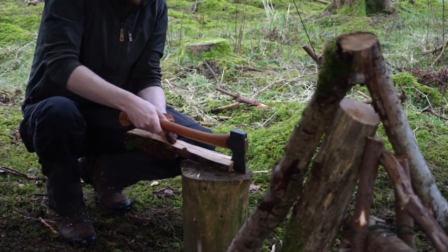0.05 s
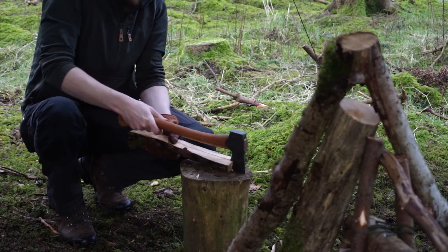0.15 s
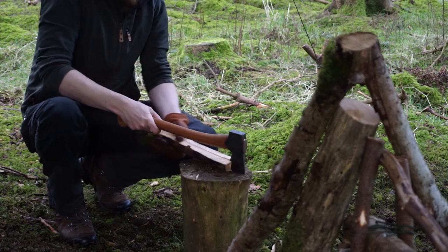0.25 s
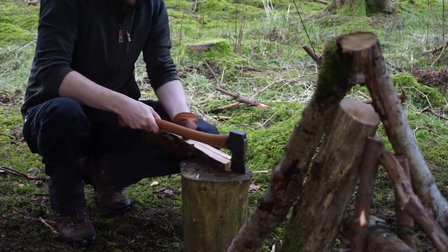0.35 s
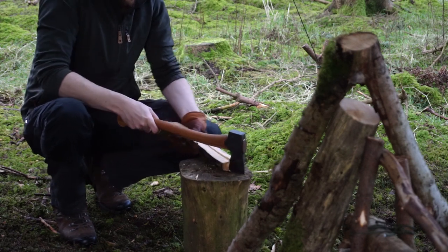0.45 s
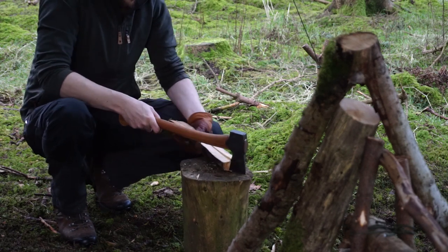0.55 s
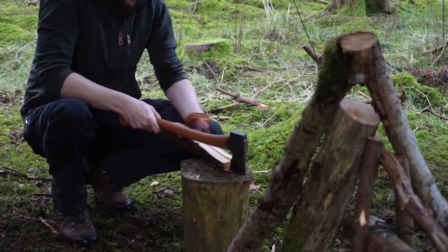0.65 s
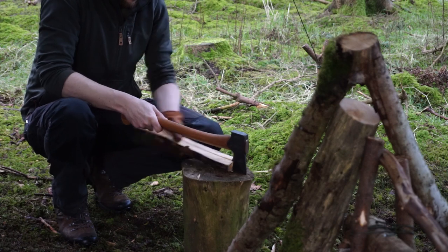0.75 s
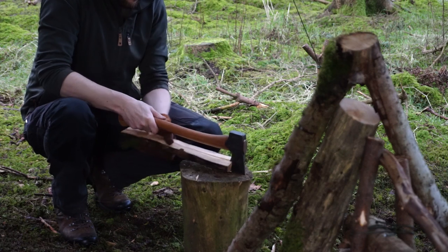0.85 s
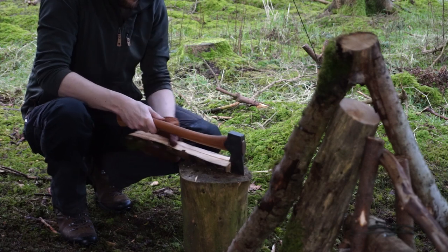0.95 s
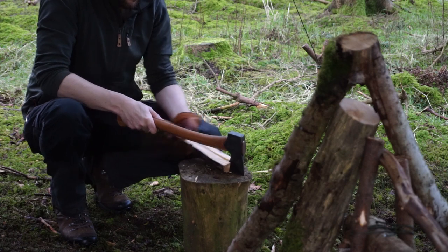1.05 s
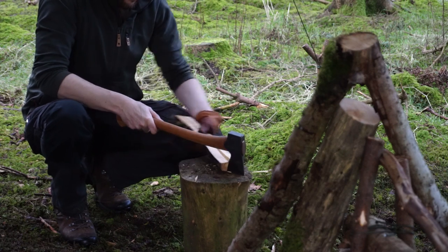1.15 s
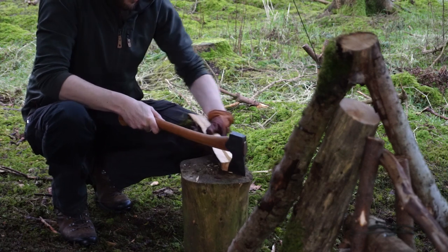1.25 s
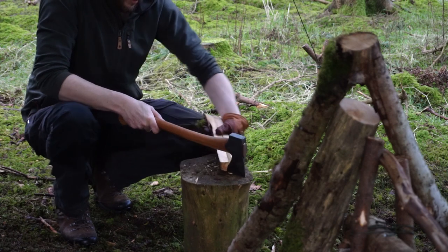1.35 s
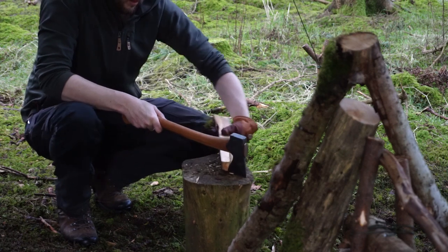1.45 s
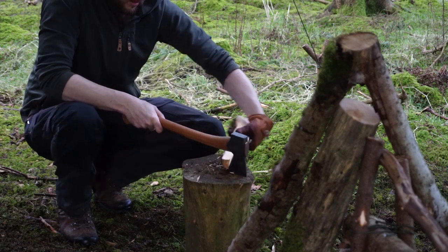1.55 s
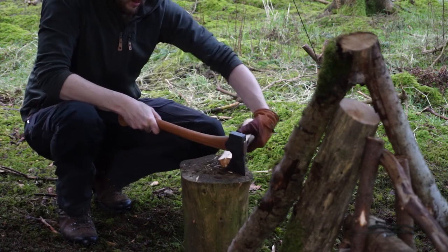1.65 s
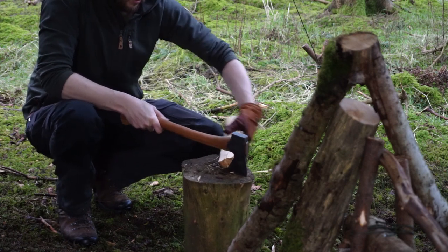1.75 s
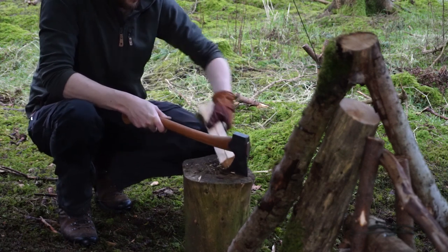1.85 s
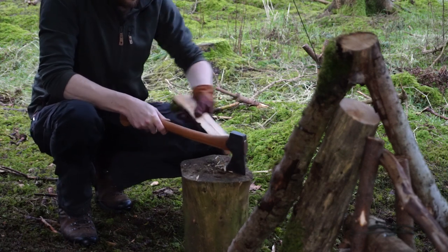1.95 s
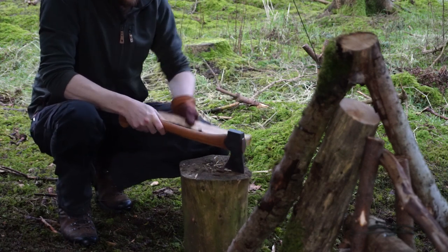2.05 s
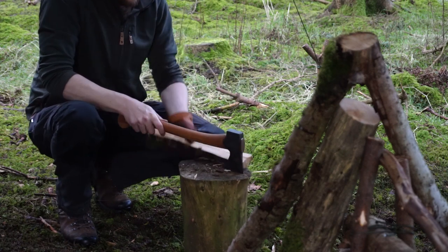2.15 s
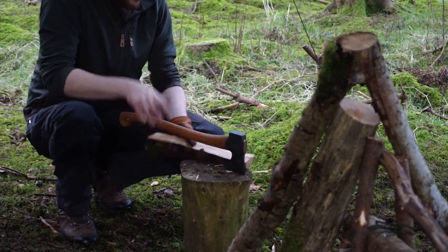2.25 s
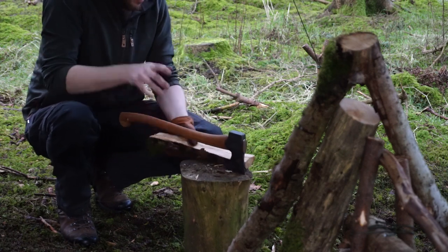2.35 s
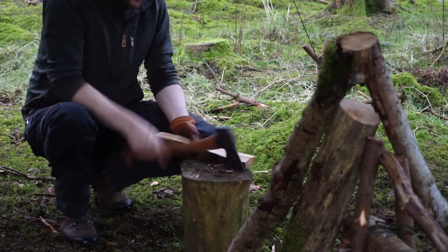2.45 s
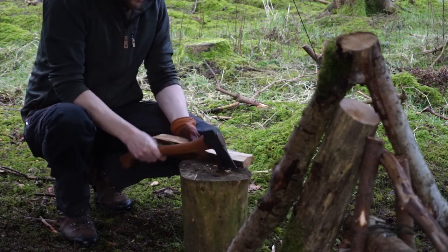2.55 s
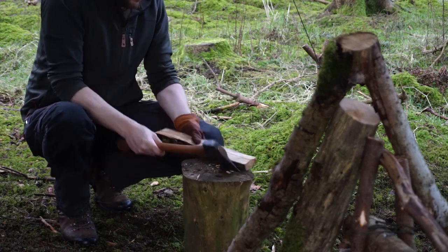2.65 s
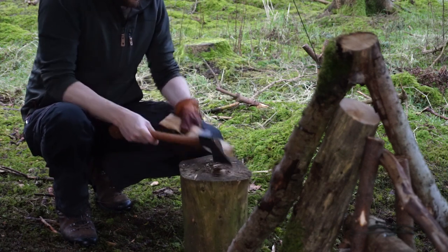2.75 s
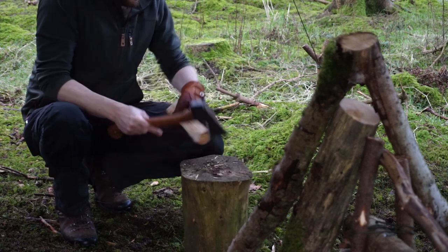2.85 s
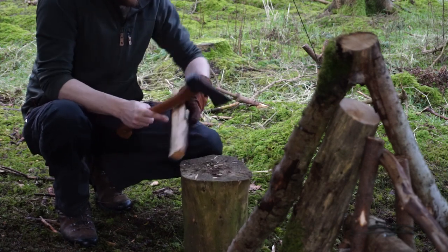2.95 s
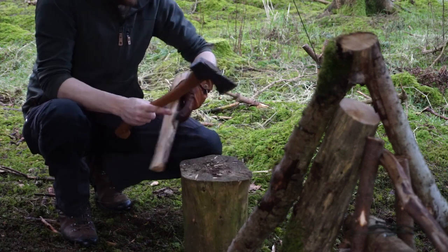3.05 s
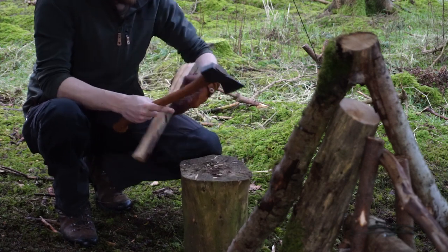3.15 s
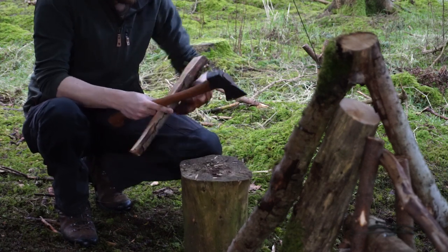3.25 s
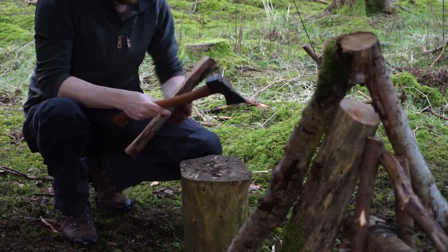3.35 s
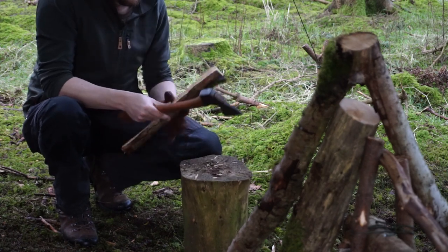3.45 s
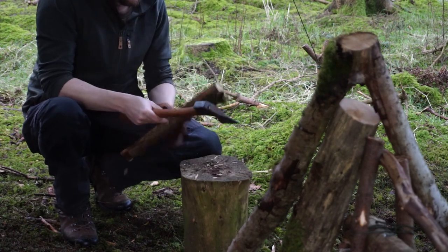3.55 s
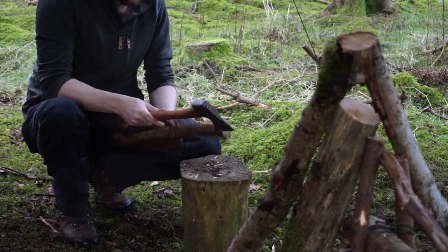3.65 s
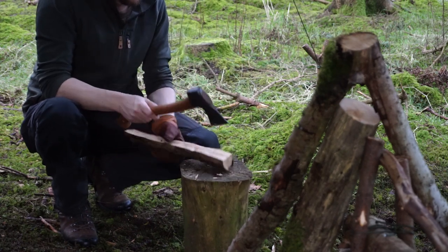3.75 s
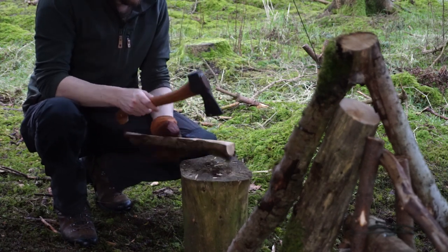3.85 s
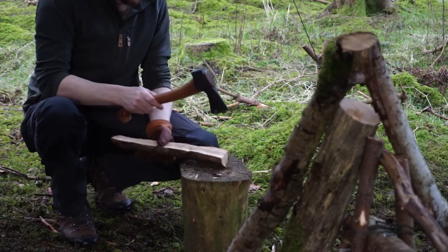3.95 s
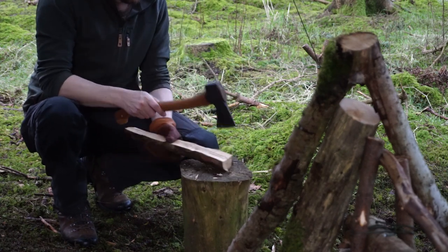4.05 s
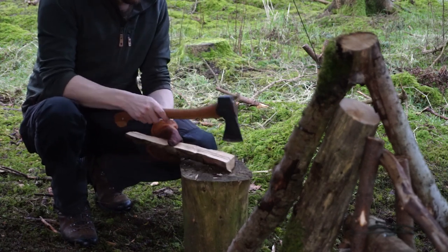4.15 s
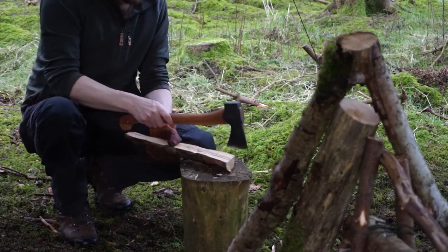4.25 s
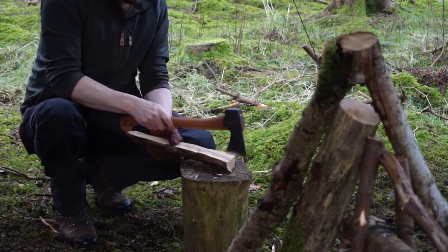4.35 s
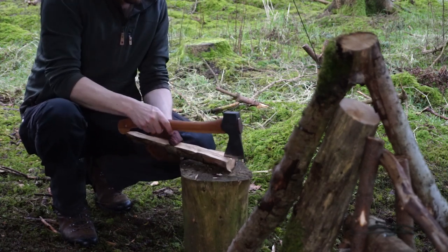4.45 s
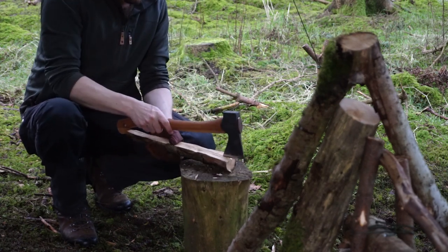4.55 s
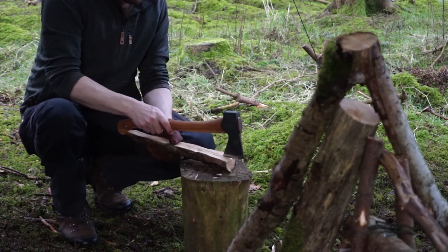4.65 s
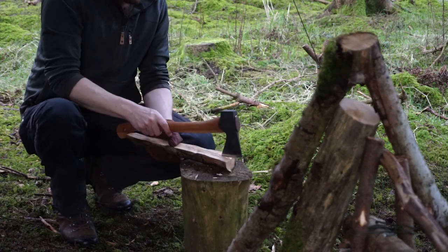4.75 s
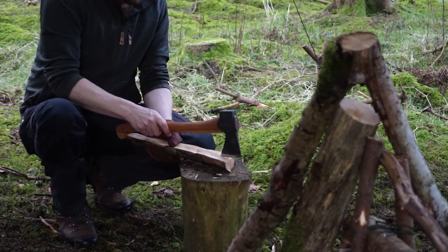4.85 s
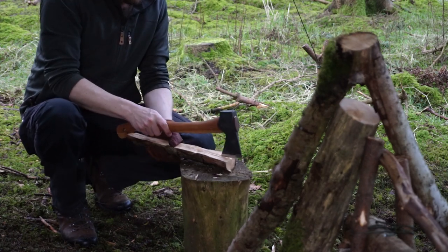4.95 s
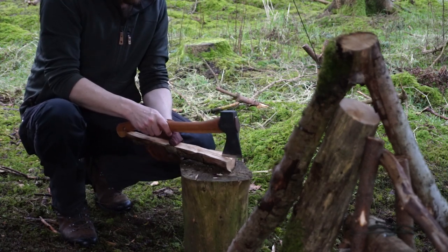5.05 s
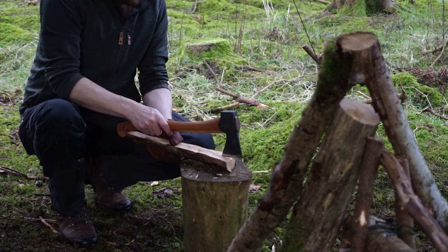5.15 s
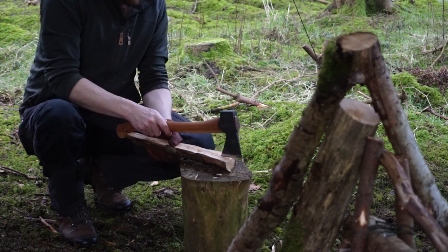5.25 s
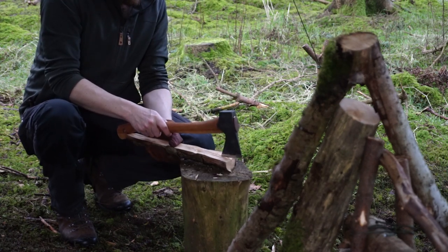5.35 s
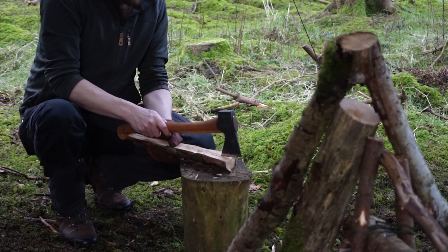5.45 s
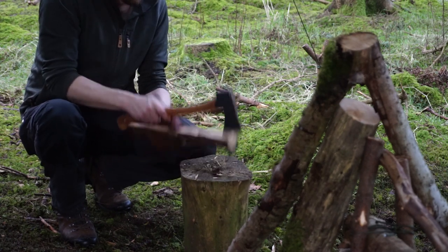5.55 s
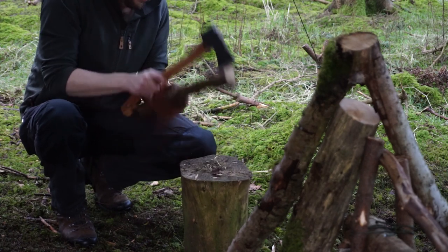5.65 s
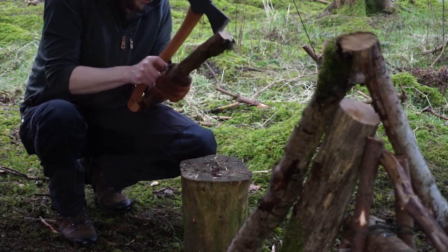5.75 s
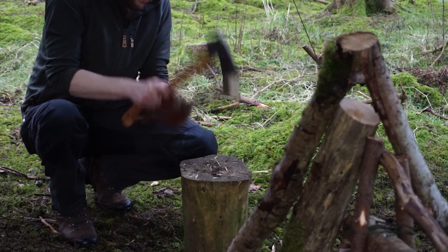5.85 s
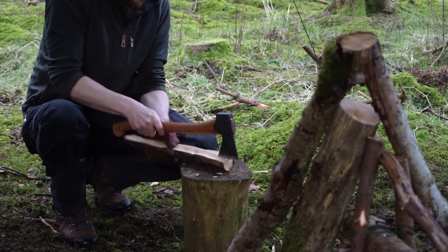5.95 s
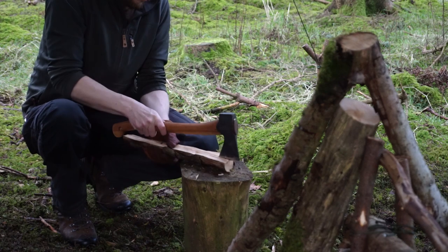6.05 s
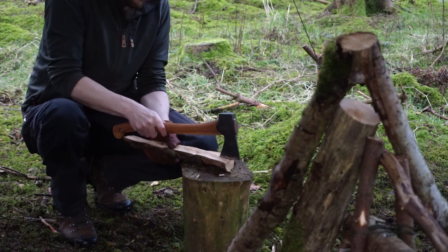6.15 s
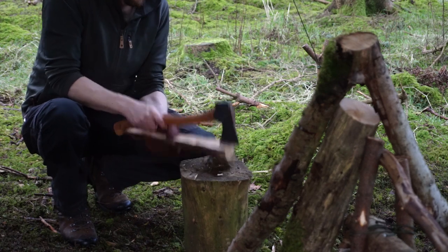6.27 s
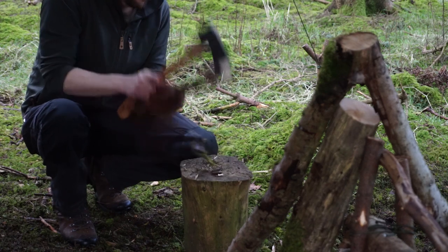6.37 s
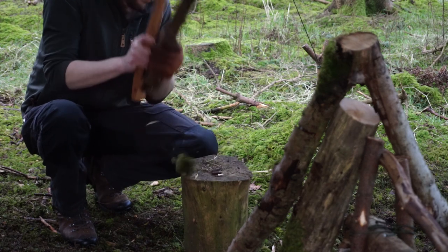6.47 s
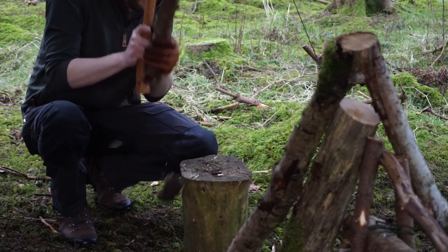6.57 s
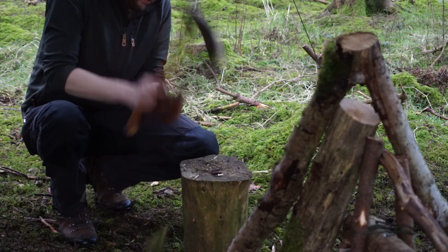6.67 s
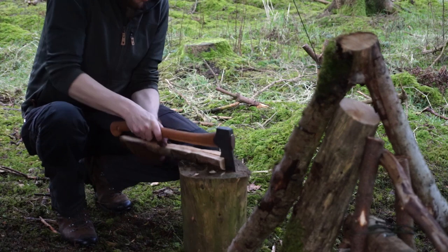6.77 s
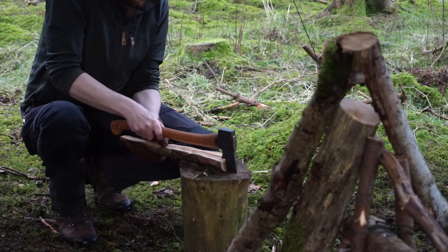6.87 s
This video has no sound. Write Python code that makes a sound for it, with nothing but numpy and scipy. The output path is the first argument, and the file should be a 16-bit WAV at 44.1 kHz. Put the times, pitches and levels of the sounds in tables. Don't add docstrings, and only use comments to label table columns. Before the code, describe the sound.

A quick, even bird trill opens the scene over still woodland air and a faint throbbing electronic hum. Fibres tick at 0.3 seconds, then a hatchet blow cracks at 0.36 and a harder one at 0.5, splintering and echoing briefly off trunks. A rattling bird call follows. A bright, hard knock lands at 1.3, with a weak splintery scrape near 1.65. Light knocks, snaps and cloth rustle come around 2.5 to 3.6, and a moderate woody tap at 3.8. From 3.9 to 4.7 birds whistle in swooping phrases over a low, soft coo, with small knocks between. Clear whistles and flicking chirps gather from 5.0 to 5.9. A full, resonant blow strikes at 6.0, a faint knock at 6.3, rustling at 6.5, and a heavy final split at 6.8 with crackle and rustle.

```python
import sys
import numpy as np
from scipy import signal
from scipy.io import wavfile
from scipy.ndimage import uniform_filter1d

SR = 44100
rng = np.random.default_rng(int(sys.argv[2]) if len(sys.argv) > 2 else 0)


def level_to_linear(level):
    exponent = np.asarray(level, float) / 20
    return 10 ** exponent


def wrap_up_sound(samples):
    columns = np.atleast_2d(samples).T
    tamed = np.clip(columns, -1, 1)
    steps = np.round(tamed * 32767).astype(np.int16)
    wavfile.write(sys.argv[1], SR, steps)


N = 304713

# frequency in Hz, level in dB.
CRACK_TONE = [(150, -44), (700, -1.5), (2300, -2.5), (3200, 6.5), (4100, -4), (8000, -10.5), (12000, -20),
              (16000, -35.5)]


def evened(x):
    return x / np.sqrt(np.mean(x ** 2) + 1e-20)


def read(points, hz):
    table_hz, value = np.transpose(points)
    return np.interp(np.log(hz + 1), np.log(table_hz + 1), value)


def add(mix, s, sound):
    part = mix[round(s * SR):][:len(sound)]
    part += sound[:len(part)]


def coloured(x, tone, tilt_db=0.):
    hz = abs(np.fft.fftfreq(2048, 1 / SR))
    gain_db = read(tone, hz) + tilt_db * np.log2(hz / 2000 + 0.019)
    log_gain = np.log(level_to_linear(gain_db))
    taps = np.fft.ifft(np.exp(np.conj(signal.hilbert(log_gain)))).real[:1024]
    return signal.oaconvolve(x, taps)[:len(x)]


def noise(tone, patchy_db):
    hz = np.fft.rfftfreq(1024, 1 / SR)
    a, b, patches = rng.standard_normal((N // 256 + 5, 513, 3)).T
    patches = uniform_filter1d(patches, size=12, axis=0)
    patches = evened(uniform_filter1d(patches, size=14, axis=1))
    z = (a + 1j * b) * level_to_linear(read(tone, hz)[:, None] + patchy_db * patches)
    return evened(signal.istft(z, nperseg=1024, noverlap=768)[1][:N])


def blow(s, row, modes, cycles):
    peak_db, contact_ms, crack_db, tilt_db, splinter_db = row
    splinter_t60 = 0.071
    t = np.arange(9000) / SR
    grit, split, chance = rng.standard_normal((3, len(t)))
    u = t * 1000 / contact_ms
    force = u * np.exp(1 - u)
    bursts = 1.36 + 2.4 * (chance > 1.9)
    splinters = level_to_linear(splinter_db - 60 * t / splinter_t60) * u.clip(0, 1) * bursts
    drive = force * (1 + 1.47 * grit) + 0.54 * splinters * grit

    ring = np.zeros(len(t))
    for hz, db in modes:
        cluster = np.sin(2 * np.pi * hz * t)
        cluster += 0.13 * sum(np.sin(2 * np.pi * hz * detune * t) for detune in (.93, 1.08))
        cluster *= level_to_linear(-60 * t * (hz * 1000) ** .5 / cycles)
        cluster *= np.minimum(t * hz, 1)
        struck = signal.fftconvolve(drive, cluster)[:len(t)]
        ring += level_to_linear(db) * struck / abs(struck).max()

    crack = coloured(split * (force + splinters), CRACK_TONE, tilt_db)
    sound = ring / abs(ring).max() + level_to_linear(crack_db) * crack / abs(crack).max()
    return s - .001, level_to_linear(peak_db) * sound / abs(sound).max()


def small_contact(s, peak_db, hz, t60, fizz_db):
    t = np.arange(3000) / SR
    shape = level_to_linear(peak_db - 60 * t / t60) * np.minimum(t / 0.00066, 1)
    ring = 0.55 * np.sin(2 * np.pi * hz * t) + 0.19 * np.sin(2 * np.pi * 1.17 * hz * t)
    fizz = evened(coloured(rng.standard_normal(len(t)), CRACK_TONE, 2.5))
    return s - .0005, shape * (ring + level_to_linear(fizz_db) * fizz)


def chopping():
    blow_starts = [.3642, .5011, 1.2751, 1.65, 2.4995, 2.5092, 3.7692, 5.9999, 6.3192, 6.7933, 6.8138]
    # peak in dB, contact in ms, crack against ring in dB,
    # crack tilt in dB per octave, splintering after it in dB.
    blow_rows = [(-7.5, 0.65, -1.5, 2.5, -17), (-1, 0.42, 5, -0.5, -14.5), (-1.5, 0.74, -7.5, 1.5, -17.5),
                 (-21.5, 0.62, 3, 0, 25), (-24, 2.3, -18, 6, -7), (-18.5, 1.06, -4.5, -2.5, -3),
                 (-14.5, 0.39, -0.5, -8, -8.5), (-3.5, 0.89, -4.5, 3, -10.5), (-22, 1.03, -2.5, -11.5, -8),
                 (-24, 1.7, -2, 4.5, 3), (-2, 1.4, 5, 0.5, -1)]
    # mode in Hz, level in dB.
    blow_modes = [
        [(1150, -3.5), (2130, -2), (3000, 0), (4700, 10)],
        [(340, -17), (580, -4), (760, 8), (1130, 3), (1620, 0), (2280, 3), (2500, 10.5), (3200, -6), (4950, -5)],
        [(600, -28), (1130, -9), (1550, -15.5), (3140, 7), (3750, -29), (4950, -8), (6500, -8), (8300, -8)],
        [(330, -7.5), (1000, -3), (2500, 4), (3400, 5.5)],
        [(700, -4), (980, -4)],
        [(235, -0.5), (700, -10), (980, -4), (3250, -11)],
        [(290, -4.5), (670, -4), (925, -10), (1300, 11.5), (1570, 8), (3050, -17)],
        [(200, -14), (285, 10), (620, 15), (945, 16), (1150, 11), (1400, 10), (1600, 7), (1870, 8), (2450, 3),
         (2870, 1), (3430, 5), (7450, 5.5)],
        [(206, 5.5), (490, 8), (620, 7.5), (800, 13), (1190, -1), (1410, 0.5), (1650, -3), (2860, -7)],
        [(510, -7.5), (1380, -1), (2580, -7), (3500, -4)],
        [(215, -4.5), (620, 3), (930, -6), (1140, 8), (1690, 7.5), (2300, 6), (2700, 6), (3050, 8), (3410, 8),
         (4600, -28)],
    ]
    grip_cycles = [25., 32, 29, 27, 28, 25., 23, 20, 17, 30, 26]
    # start in seconds, peak in dB, pitch in Hz, fizz against the pitch in dB.
    fibre_snaps = [(0.301, -28.5, 3360, -5), (0.3167, -26.5, 3230, -17), (0.342, -23.5, 3370, -6.5),
                   (0.349, -14.5, 3450, -19), (0.3685, -21, 4180, -9), (0.3956, -15.5, 3200, -9.5),
                   (0.4026, -23, 3450, -14), (0.419, -27, 2590, -8.5), (0.533, -22, 3060, -12),
                   (0.543, -29, 2720, -7), (1.0492, -44, 3640, -3), (1.1147, -41, 3000, -5),
                   (1.2316, -34, 1570, -12), (1.317, -22, 3230, -20), (1.597, -39, 3170, -7),
                   (1.63, -36.5, 2940, -3), (1.6422, -27.5, 3580, -6), (2.2412, -39, 2520, -11),
                   (2.269, -37.5, 2840, -8.5), (2.834, -32, 2500, -12), (3.1966, -40, 2490, -7),
                   (3.2864, -33, 2630, -9), (3.5185, -35, 6100, -12), (3.5208, -30.5, 3140, -8.5),
                   (3.6064, -30.5, 4580, -12.5), (3.625, -32.5, 6870, -7), (3.68, -41, 2280, -3),
                   (4.503, -30.5, 1720, -10.5), (4.5035, -42, 6300, -15), (5.7537, -36, 2780, -26),
                   (6.4537, -38, 2230, -17), (6.856, -21.5, 2720, -12)]
    # start in seconds, peak in dB, pitch in Hz, t60 in seconds, fizz in dB.
    small_knocks = [(1.233, -40, 762, 0.083, -14), (1.678, -27, 362, 0.015, -28),
                    (2.539, -36.5, 616, 0.051, -13), (2.8342, -25, 560, 0.02, -14),
                    (3.319, -37.5, 890, 0.065, -20), (3.806, -27.5, 646, 0.053, -16.5),
                    (3.825, -27, 667, 0.041, -21), (4.37, -28.5, 610, 0.025, -19),
                    (6.0012, -14, 620, 0.021, -8), (6.0095, -11, 480, 0.016, -34.5),
                    (6.8172, -12, 610, 0.035, -31), (6.8141, -5, 3300, 0.014, -14),
                    (2.844, -38, 480, .05, -25)]
    snap_t60, mic_cut_hz = 0.018, 226

    out = np.zeros(N)
    for hit in zip(blow_starts, blow_rows, blow_modes, grip_cycles):
        add(out, *blow(*hit))
    for s, peak_db, hz, fizz_db in fibre_snaps:
        add(out, *small_contact(s, peak_db, hz, snap_t60, fizz_db))
    for row in small_knocks:
        add(out, *small_contact(*row))
    return signal.sosfilt(signal.butter(4, mic_cut_hz, "high", fs=SR, output="sos"), out)


def thuds():
    # start in seconds, level in dB.
    ground_thuds = [
        (6.06, -64),
        (6.8, -65),
    ]
    thud_hz, thud_s = 74, .09
    t, out = np.arange(0, thud_s, 1 / SR), np.zeros(N)
    swell = np.sin(np.pi * t / thud_s) ** 2 * np.sin(2 * np.pi * thud_hz * t)
    for s, db in ground_thuds:
        add(out, s, level_to_linear(db) * swell)
    return out


def rustle():
    # start in seconds, end in seconds, rms level in dB.
    movements = [(0.277, 0.499, -54), (0.67, 0.828, -59), (1.035, 1.105, -54.5), (1.228, 1.273, -51),
                 (1.305, 1.463, -55), (1.563, 1.713, -55), (2.223, 2.287, -63), (2.55, 2.649, -57),
                 (2.777, 2.907, -58), (3.04, 3.307, -61.5), (3.26, 3.38, -52), (3.314, 3.804, -56.5),
                 (4.09, 4.125, -59), (4.597, 4.797, -75), (5.717, 5.79, -59), (6.03, 6.152, -67),
                 (6.426, 6.495, -57), (6.53, 6.679, -53.5), (6.82, 7.0, -44)]
    # frequency in Hz, level in dB.
    cloth_tone = [(100, -63), (400, -3), (1200, 5), (3000, 4.5), (6000, 2), (10000, -9), (15000, -31.5)]
    size = level_to_linear(2.3 * np.minimum(rng.exponential(1, N), 3.6))
    happens = rng.random(N) < 900 / SR
    slips = size * happens * rng.standard_normal(N)
    movement = np.zeros(N)
    for start, end, db in movements:
        add(movement, start, level_to_linear(db) * signal.windows.tukey(round((end - start) * SR), .7))
    return movement * evened(evened(coloured(slips, cloth_tone)) + 1.8 * noise(cloth_tone, 2.2))


def echoes(x):
    # delay in seconds, level in dB.
    returns = [
        (.0065, -5.5),
        (0.017, -13.5),
        (0.033, -42.5),
        (.043, -23),
    ]
    out = np.zeros(N)
    for delay, db in returns:
        add(out, delay, level_to_linear(db) * x)
    return coloured(out, [(300, -26.0), (1500, -5.0), (3200, -7.5), (6000, -10.0), (12000, -6.0)])


def tail(x, stretch):
    # frequency in Hz, t60 in seconds.
    wood_t60 = [(200, 0.96), (800, 0.33), (3000, 0.75), (6000, 0.53), (12000, 0.33)]
    taps = np.zeros(SR)
    at = np.arange(300, SR - 20, 20) + rng.integers(0, 20, (SR - 301) // 20)
    taps[at] = rng.choice([-1., 1.], len(at))
    hz, t, z = signal.stft(taps, SR, nperseg=256)
    decay = level_to_linear(-60 * t / (stretch * read(wood_t60, hz)[:, None]))
    taps = signal.istft(z * decay, SR, nperseg=256)[1]
    return signal.oaconvolve(x, taps / np.linalg.norm(taps))[:N]


def slur(start, length, from_hz, to_hz, db):
    u = np.linspace(0, 1, num=16)
    hz = from_hz + (to_hz - from_hz) * np.sin(u * np.pi / 2) ** 2
    return np.c_[start + u * length, hz, db - 2.5 * (2 * u - 1) ** 2]


def held(start, length, from_hz, to_hz, db):
    u = np.linspace(0, 1, num=16)
    hz = to_hz + (from_hz - to_hz) * np.exp(-u / 0.299)
    return np.c_[start + u * length, hz, db - 6.5 * u]


def whistle(rows, waver, size=300):
    s, hz, db = np.transpose(rows)
    t = np.arange(s[0], s[-1], 1 / SR)
    drift = uniform_filter1d(rng.standard_normal(len(t)), size=size)
    flutter = 1 + waver * evened(uniform_filter1d(drift, size=size))
    edge = np.minimum(np.minimum(t - s[0], s[-1] - t) / 0.0052, 1)
    tone = np.sin(2 * np.pi * np.cumsum(np.interp(t, s, hz)) / SR)
    return s[0], np.sqrt(2) * level_to_linear(np.interp(t, s, db)) * edge * flutter * tone


def songs():
    # start in seconds, length in seconds, from Hz, to Hz, level in dB.
    thrush = [(1.7, 0.15, 2246, 2404, -66), (2.35, .15, 2324, 2220, -72), (2.745, 0.07, 2920, 3700, -62),
              (3.4, .32, 1514, 1640, -66.5), (4.66, 0.2, 2344, 2258, -67), (4.95, 0.052, 3350, 3730, -67),
              (4.95, 0.13, 2110, 1900, -68.5), (5.11, 0.046, 3220, 3980, -60.5),
              (5.385, 0.066, 2920, 3020, -63), (5.455, 0.052, 2745, 2340, -58.5),
              (5.62, 0.059, 2540, 2060, -61.5), (5.865, .055, 1900, 2700, -65),
              (6.1, .045, 1926, 2450, -64), (6.335, 0.043, 2200, 2460, -65)]
    finch = [(3.55, 0.19, 2400, 2310, -68), (4.25, .052, 4870, 5670, -63), (4.97, .06, 7200, 7400, -69),
             (4.99, 0.047, 4690, 4370, -69), (5.385, 0.051, 1790, 1990, -71),
             (5.415, .035, 4000, 3150, -63), (5.6, 0.05, 4300, 3100, -64), (5.5, .02, 2000, 2500, -64),
             (6.19, 0.019, 3370, 3580, -63), (6.24, 0.046, 2880, 3660, -62.5), (6.35, .07, 4220, 4230, -74),
             (6.4, .03, 2450, 2250, -69)]
    robin = [(3.09, 0.098, 4070, 4380, -62), (3.88, .03, 5110, 5000, -60), (4.35, 0.14, 4020, 4000, -64),
             (5.085, 0.011, 7060, 5800, -59), (5.28, 0.093, 3084, 2906, -45),
             (5.37, 0.066, 6000, 4900, -65), (5.45, 0.057, 2890, 2810, -44.5),
             (5.515, 0.44, 2920, 2852, -64), (5.81, 0.043, 2410, 2280, -60)]
    wren = [(5.262, .028, 3500, 4000, -65), (5.458, .026, 3150, 4000, -56.5), (5.552, .05, 3950, 4450, -62),
            (5.657, 0.033, 3100, 4200, -59), (5.73, .035, 3250, 4150, -65), (5.785, .04, 2850, 3670, -57),
            (5.83, 0.038, 3400, 3310, -62), (5.955, .025, 3100, 3500, -64)]
    dove = [
        (0.0, 0.64, 373.3, 382.8, -60.5),
        (3.95, 1.05, 415.8, 418.6, -66),
    ]
    # time in seconds, pitch in Hz, level in dB.
    phrases = [
        [(3.872, 3600, -66), (3.892, 3830, -62), (3.905, 3720, -57), (3.925, 3330, -55), (3.945, 3150, -58),
         (3.965, 3000, -60), (3.985, 2720, -60)],
        [(4.19, 3850, -68), (4.22, 4200, -63), (4.26, 4260, -62), (4.33, 4150, -68)],
        [(4.258, 3400, -60), (4.295, 3620, -55), (4.33, 4020, -55), (4.348, 4150, -60), (4.36, 4100, -51),
         (4.372, 3800, -55), (4.387, 3400, -54), (4.418, 3310, -55)],
        [(4.542, 6850, -64), (4.552, 5850, -59), (4.563, 5560, -58), (4.58, 5550, -61), (4.597, 4750, -66),
         (4.604, 3500, -60), (4.617, 2740, -55), (4.63, 2950, -57), (4.652, 3680, -60)],
    ]
    singers = [(thrush, slur, .35), (finch, slur, .35), (robin, held, .3), (wren, held, .3), (dove, held, .8)]
    out = np.zeros(N)
    for notes, shape, waver in singers:
        for row in notes:
            add(out, *whistle(shape(*row), waver))
    for rows in phrases:
        add(out, *whistle(rows, .25))
    return out


def rough_calls():
    # start in seconds, length in seconds, from Hz, to Hz, level in dB.
    warble = [(4.3, 0.036, 3200, 3250, -63), (4.035, 0.0595, 3120, 2780, -63),
              (4.085, .03, 2900, 2280, -66), (3.875, .06, 2300, 2500, -70), (3.945, .05, 2380, 2340, -69),
              (3.95, .12, 2000, 1950, -73), (4.0, .1, 2900, 2400, -68), (3.8, 0.065, 3600, 3200, -67),
              (0.55, .025, 3100, 2600, -59), (.625, .065, 2750, 2200, -61), (0.75, .07, 2800, 3000, -64),
              (.55, 0.055, 2450, 2400, -65), (3.1, .17, 3200, 3150, -71), (3.28, .12, 3280, 3250, -71),
              (3.42, .1, 3300, 3100, -68), (3.54, .2, 3180, 3180, -69), (3.27, .045, 2550, 2750, -64)]
    buzz = [
        (1.31, 0.34, 3120, 3200, -77),
    ]
    rattle = (.545, .1, 3380, 3540, -54)
    rattle_hz, rattle_depth = 170, .8
    out = np.zeros(N)
    for row in warble:
        add(out, *whistle(slur(*row), 2.0, size=70))
    for row in buzz:
        add(out, *whistle(slur(*row), 2.88, size=60))
    s, tone = whistle(slur(*rattle), 0.33)
    t = np.arange(len(tone)) / SR
    add(out, s, tone * (1 + rattle_depth * np.sin(2 * np.pi * rattle_hz * t)))
    return out


def trill():
    # time from the syllable's start in seconds, pitch in Hz, level in dB.
    syllable = [(-.004, 1900, -58.5), (.003, 3145, -46), (.008, 3010, -48), (.014, 2540, -45.5),
                (.021, 2390, -51), (.027, 1950, -63), (.034, 2390, -51.5), (.042, 1950, -53)]
    start_s, gap_s, count = .033, .0748, 6
    out = np.zeros(N)
    for k in range(count):
        add(out, *whistle(np.array(syllable) + [start_s + k * gap_s, 0, 0], .3, size=120))
    return out


def chorus():
    # time in seconds, level in dB.
    swells = [(0, -48.5), (.3, -56), (.56, -43), (.68, -48), (.78, -56), (1.35, -53.5), (2.0, -63),
              (2.7, -62), (3.3, -55.5), (3.75, -51.5), (3.87, -53.5), (3.97, -49), (4.1, -50.5), (4.2, -55),
              (4.7, -56.5), (4.9, -60.5), (5.25, -61.5), (5.5, -60), (6.3, -58.5), (6.91, -56.5)]
    # frequency in Hz, level in dB.
    far_tone = [(500, -64), (1500, -11), (2200, -7), (2900, -4.5), (3600, -6), (4500, -11.5), (6000, -24)]
    gain = level_to_linear(np.interp(np.arange(N) / SR, *np.transpose(swells)))
    return gain * level_to_linear(-5.5) * noise(far_tone, 0.79)


def air():
    # frequency in Hz, level in dB per Hz.
    air_tone = [(30, -61), (121, -31.5), (141, -7.5), (179, -23), (227, -7.5), (700, -6), (1900, -24.5),
                (16000, -26)]
    return level_to_linear(-55.5) * noise(air_tone, 0.61)


def hum():
    # multiple of the base rate, rms level in dB.
    hum_lines = [(4, -91), (8, -86), (11, -84), (12, -75), (13, -82), (15, -77), (17, -63), (18, -79),
                 (19, -59), (20, -76), (21, -72), (772, -89), (776, -85), (780, -87), (1028, -95),
                 (1032, -86), (1036, -86), (1040, -91)]
    base_hz = 12.5
    t = np.arange(N) / SR + 0.01096
    return sum(np.sqrt(2) * level_to_linear(db) * np.sin(2 * np.pi * k * base_hz * t) for k, db in hum_lines)


def side_hiss():
    # frequency in Hz, level in dB per Hz.
    hiss_tone = [(18, -72), (30, -35), (161, -4), (280, 1.5), (822, -1), (2200, -3), (16000, -4.5)]
    return level_to_linear(-62) * noise(hiss_tone, 0.598)


def scene():
    near = chopping()
    far = songs() + rough_calls() + trill()
    scattered = coloured(near, [(80, -29.5), (300, -14.0), (1500, -4.0), (3000, -10.0), (6000, -10.0)])
    mid = near + echoes(near) + level_to_linear(-15.0) * tail(scattered, 0.7)
    mid += level_to_linear(1.5) * far + level_to_linear(-3.0) * tail(far, 1.35)
    mid += thuds() + rustle() + chorus() + air() + hum()
    side = side_hiss()
    return np.array([mid + side, mid - side])


def roll_off(x):
    return signal.sosfilt(signal.butter(12, 16630, fs=SR, output="sos"), x)


def record(dry):
    edge_hz = 15950
    taps = signal.firwin(511, edge_hz, window=("kaiser", 9), fs=SR)
    limited = signal.oaconvolve(dry, taps[None], "same")
    return roll_off(limited)


dry = scene()
out = record(dry)
wrap_up_sound(out)
```